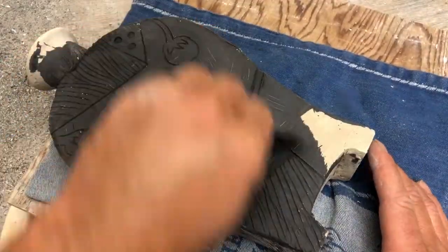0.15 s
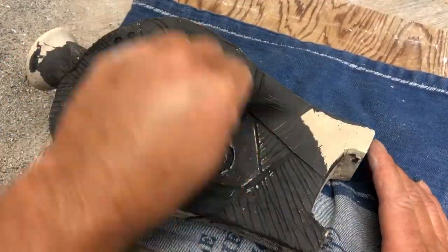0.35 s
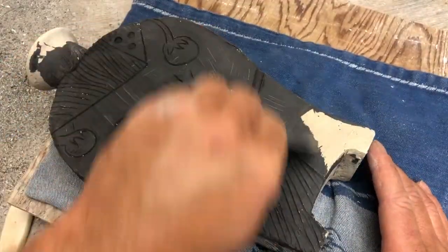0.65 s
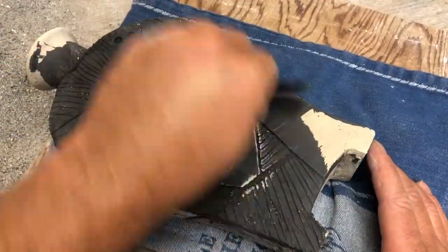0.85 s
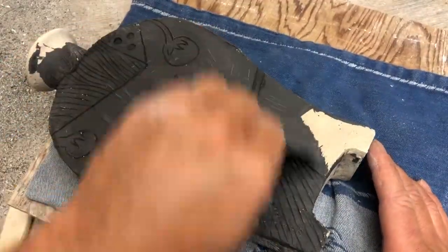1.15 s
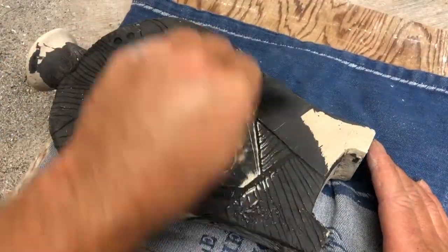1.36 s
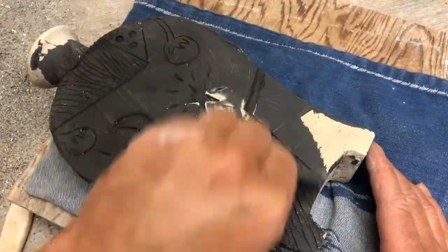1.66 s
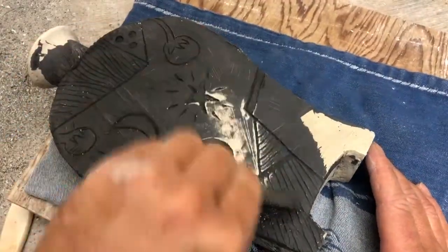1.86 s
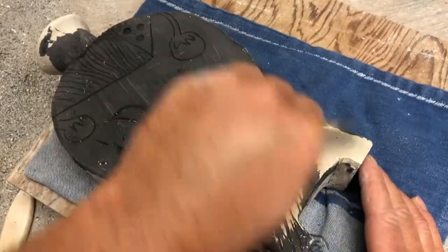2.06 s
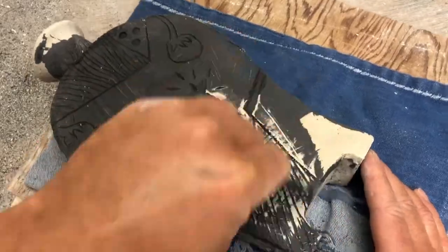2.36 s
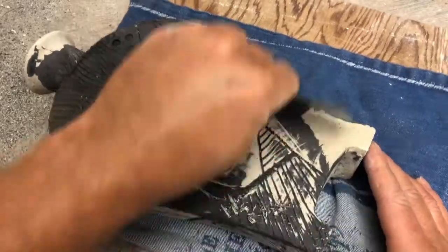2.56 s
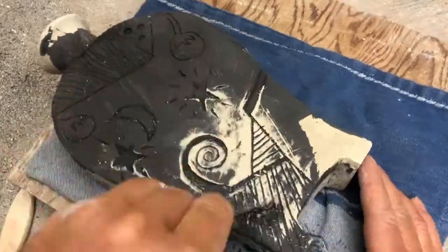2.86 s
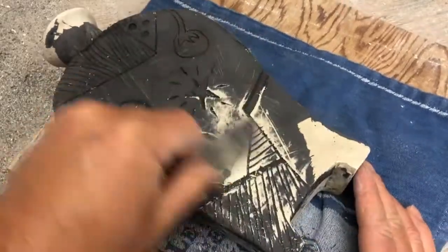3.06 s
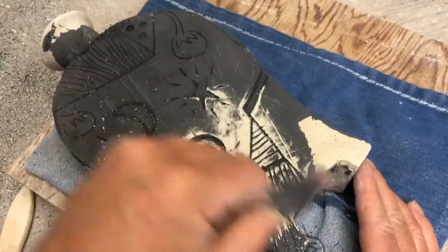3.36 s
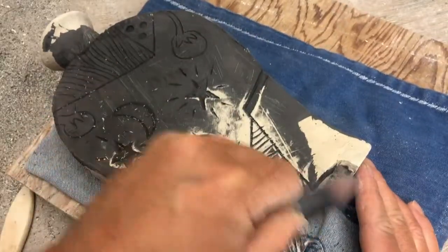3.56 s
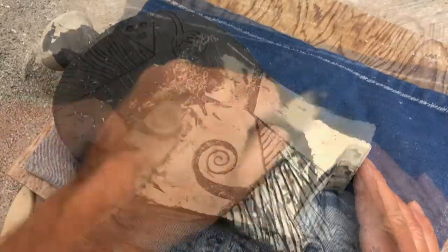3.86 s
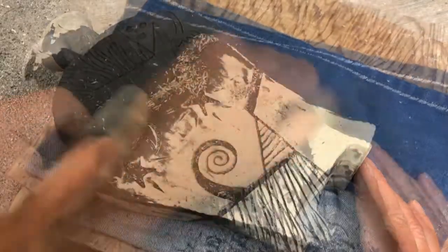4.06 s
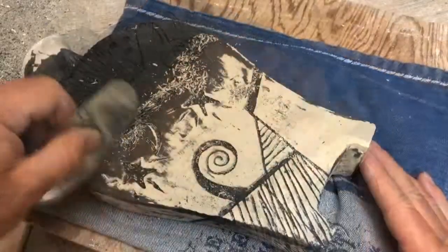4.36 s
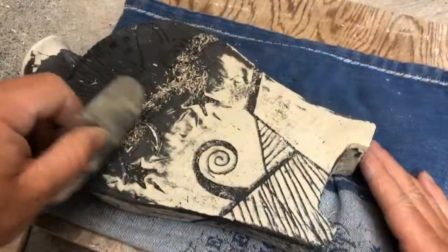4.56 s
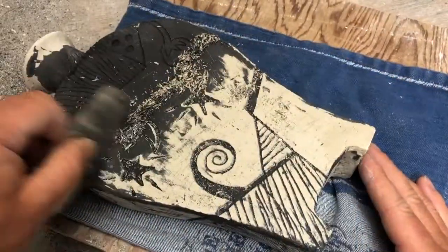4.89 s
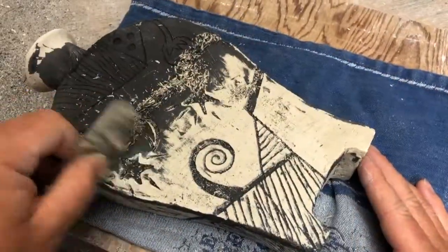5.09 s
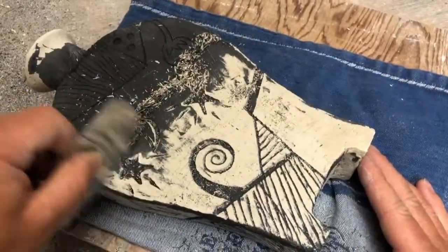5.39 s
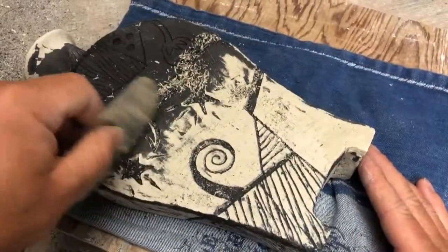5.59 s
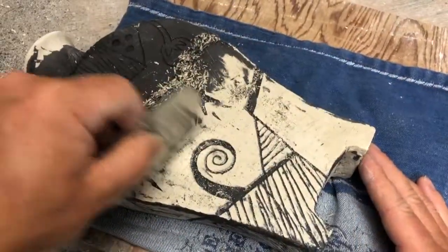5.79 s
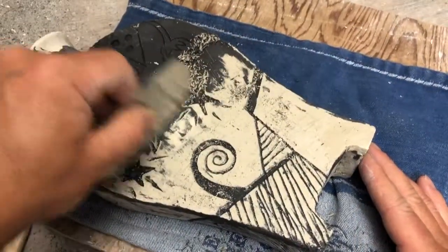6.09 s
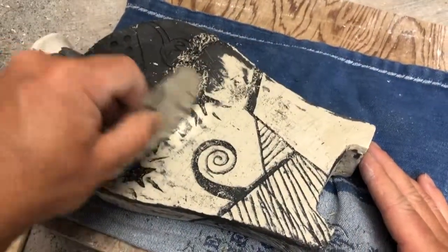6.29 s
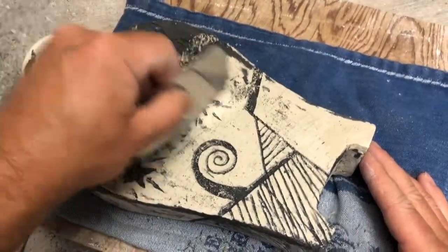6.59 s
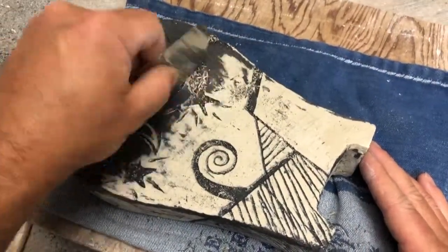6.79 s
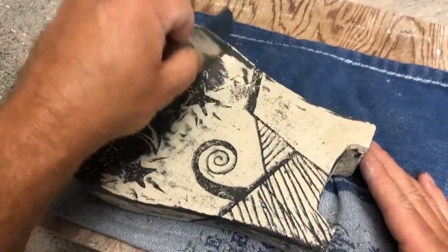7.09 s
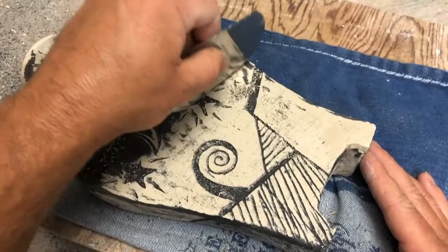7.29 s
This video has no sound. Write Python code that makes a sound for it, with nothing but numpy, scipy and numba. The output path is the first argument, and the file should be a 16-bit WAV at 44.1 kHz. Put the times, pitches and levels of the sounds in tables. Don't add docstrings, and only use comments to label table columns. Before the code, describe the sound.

A hand-held steel scraper works on a dry clay slab on a towel-covered wooden table. About twice a second it lands with a small tick and low thump, then drags in a short, gritty rasp. Early strokes are even; later ones grow more irregular, with bright cracks as the edge jumps grooves. Close phone microphone in a quiet, lightly reverberant workroom with a faint hum.

```python
import sys
import numpy as np
from scipy import signal
from scipy.fft import rfft, irfft
from scipy.io import wavfile
from scipy.ndimage import uniform_filter1d
from numba import njit

SR = 44100
rng = np.random.default_rng(int(sys.argv[2]) if len(sys.argv) > 2 else 0)


def volts_from_db(level):
    exponent = np.asarray(level, float) / 20
    return 10 ** exponent


def pcm_store(signal):
    levels = np.round(np.clip(np.atleast_2d(signal), -1, 1) * 32767)
    wavfile.write(sys.argv[1], SR, levels.astype(np.int16).T)


N = 328118

# (frequency [Hz], density [dB per Hz])
ROOM_AIR = [(15, -4.5), (25, 13), (66, -12.5), (129, -12.5), (315, -17.5), (361, -13.5), (402, -21),
            (540, -26), (854, -30), (1000, -33), (4300, -34.5), (7380, -39), (11100, -40), (14500, -47),
            (15700, -47.5)]
# (frequency [Hz], width [Hz], level [dB rms])
LAMPS_AND_FAN = [(358, 14, -79), (1916, 30, -92), (6266, 60, -91), (10300, 60, -93), (11289, 80, -87.5)]
ROOM_AIR_DB = -65.5
WALL_LAGS = np.array([523, 691, 887, 1069, 1301, 1553, 1831, 2141])
WALLS_T60_S, WALLS_DAMP, SCRAPE_TO_WALLS_DB, BLOWS_TO_WALLS_DB = 0.28, 0.14, -13, -13.5
SCATTER_T60_S = 0.04

# (frequency [Hz], swing pushed mid-slab [ratio], swing pushed near the rim [ratio], t60 [s])
TABLE_MODES = [(41.6, .7, .4, .75), (56.4, .25, .6, .75), (79, 1.9, .4, .23), (83, -4.3, -2.6, .17)]
# (frequency [Hz], width [Hz], level [dB])
TREMBLE_MODES = [(40.3, 18.0, -7.5), (62.4, 4.6, -17.0), (76.9, 5.3, -5.5)]
# (frequency [Hz], level [dB], t60 [s])
BOARD_MODES = [(137, 5, 0.24), (224.7, 3.5, 0.09)]
# (time [s], table thump [dB], board [dB])
LIFTS = [(0.407, -38.5, -60), (0.907, -36.5, -45.5), (1.407, -37, -65), (1.919, -46, -58.5),
         (2.349, -43, -77), (2.736, -36, -73.5), (3.036, -71.5, -35.5), (3.187, -45, -64),
         (3.559, -40, -54), (3.989, -38, -72), (4.383, -37.5, -73), (4.819, -41, -69), (5.147, -46, -61),
         (5.431, -44.5, -44), (5.843, -48, -81), (6.166, -36, -57), (6.188, -37.5, -33.5),
         (6.671, -42.5, -68), (7.06, -43, -52), (7.158, -39, -80.5)]
PUSH_DELAY_S, PUSH_S = 0.003, 0.014
SHAKE_REST_DB, SHAKE_RISE_S, SHAKE_FADE_DB_PER_S = -60, 0.018, 78.5

# (time [s], slab knock peak [dB], edge tick [dB], table trembling [dB], table thump [dB])
LANDINGS = [(0.195, -39, -46.5, -59, -34.5), (0.712, -38, -39, -56, -33), (1.171, -38, -45.5, -63, -34),
            (1.689, -40, -44.5, -62.5, -33), (2.151, -41.5, -51, -63, -35), (2.577, -35, -45, -33, -34),
            (2.997, -39, -42, -38, -32), (3.393, -35.5, -44, -38, -31), (3.804, -33.5, -52, -32.5, -30),
            (4.227, -46, -47.5, -35.5, -38.5), (4.695, -64, -34, -39, -35.5), (5.061, -46, -28, -37.5, -30),
            (5.369, -41, -36, -29.5, -23.5), (5.711, -54.5, -42, -34, -24.5), (6.102, -68, -30, -39, -26),
            (6.552, -55, -48.5, -45, -40), (7.004, -48, -33, -36.5, -26), (7.379, -41, -41.5, -43, -29.5)]
# (time [s], peak [dB], treble above it [dB], bass above it [dB], pitch [Hz])
SNAPS = [(2.297, -36, -18.5, -31.5, 1850), (2.705, -26, -28.5, -14, 1950), (2.741, -28, -32, -3, 1390),
         (3.128, -26, -27, -32, 1730), (3.879, -33, -4, -3, 2900), (4.393, -34.5, -1.5, -34, 3020),
         (4.767, -37, 2, -19, 2400), (4.818, -21, -32, -11, 765), (4.833, -30, -10, -28, 3380),
         (5.087, -37, 0.5, -4, 4630), (5.135, -35, -4, -20.5, 4630), (5.427, -31, -2.5, -5, 1700),
         (5.477, -4.5, -16, -42.5, 2380), (5.741, -27.5, -4, -10.5, 800), (5.83, -6, -22, -19, 1550),
         (6.173, -28, -21.5, -4.5, 920), (6.759, -35.5, -3, -30.5, 915), (7.41, -39, -10, -20, 2820)]
# (time [s], peak [dB], pitch [Hz])
CRUMBS = [(0.319, -30.5, 2530), (0.344, -33.5, 2900), (0.436, -33.5, 2900), (0.811, -31, 2660),
          (0.9, -33, 2964), (4.546, -53.5, 2060), (0.695, -44, 2727), (1.214, -37.5, 3350),
          (2.611, -37.5, 2900), (3.179, -44, 1190), (4.151, -45, 2075), (4.335, -46, 800),
          (6.143, -33, 2704), (6.708, -43, 2390), (6.901, -46, 3100), (6.981, -44, 2820),
          (7.365, -56, 7000), (1.732, -39, 1640), (1.745, -41, 3340), (2.173, -42, 3330),
          (2.679, -37, 2750), (3.423, -42, 2890), (3.842, -48, 2930), (3.96, -35, 900), (4.247, -42, 1820),
          (5.151, -37, 1510), (5.416, -46, 4700), (6.577, -50, 2750), (7.037, -40, 3310),
          (7.4207, -36, 5100)]
# (frequency [Hz], level [dB], t60 [s])
SLAB_MODES = [(197.4, -12.5, 0.295), (284, -3, 0.036), (350, 0, 0.068), (590, -1, 0.0167),
              (733, -8.5, 0.0275)]
# (frequency [Hz], level [dB], t60 [s])
EDGE_MODES = [(855, -1, 0.029), (1310, 2.5, 0.011), (1528.5, -6.5, 0.1), (2218, -2.5, 0.049),
              (2900, 3, 0.024), (3350, -3, 0.031), (4100, -14, 0.009), (5400, -5, 0.018)]
# (frequency [Hz], level [dB], t60 [s])
PING_MODE = (2900, 1.5, 0.044)
# (frequency [Hz], level [dB], t60 [s])
RIM_MODES = [(785, -6, 0.029), (1010, 1.5, 0.0083), (1470, 5.5, 0.0033), (1750, 1, 0.01),
             (2250, -2.5, 0.028), (2660, 0, 0.0065), (3578, 8, 0.0032), (5330, -13, 0.018),
             (6500, -14, 0.0091)]
# (frequency [Hz], level [dB], t60 [s])
CRACK_MODES = [(800, -0.5, 0.017), (924, 2, 0.019), (1220, 3, 0.019), (1404, 1.5, 0.016),
               (1550, 4.5, 0.017), (1844, 1, 0.023), (1940, -8.5, 0.035), (2210, -5.5, 0.011),
               (2530, 3.5, 0.019), (3885, -1, 0.015), (4050, -10, 0.032), (5050, 1.5, 0.01),
               (6170, -4, 0.0074), (7340, 2.5, 0.0082)]
# (frequency [Hz], level [dB], t60 [s])
AFTER_MODES = [(765, -10.5, .1), (915, -2.5, .12), (1176, 1, 0.19), (1360, -5, .12), (1555, -4.5, .12),
               (1615, -3, .12), (1986, -4.5, .1), (2240, -3, .1), (2520, -1.5, .11), (3600, -5.5, 0.16),
               (3900, -9, 0.12), (4660, -5.5, .12)]
AFTER_DB, CRUMB_TREBLE_DB, CRUMB_BASS_DB = -17, -5, -7.5
DULL_PER_KHZ = 0.084
FLAT_FROM_S, RIM_FROM_S = 2.5, 4.6

# (frequency [Hz], width [Hz], level [dB])
BLADE_MODES = [(1950, 55, 9), (2500, 110, -15), (2900, 54, 2), (3240, 290, -1.5), (4410, 230, -7),
               (5640, 780, 6), (7680, 106, -38), (8700, 180, -33)]
# (frequency [Hz], level [dB])
SLAB_DRONE = [(198, -8.5), (290, -3.5), (355, -3.5), (460, -8.0)]
# (frequency [Hz], density [dB per Hz])
GRIT_SPECTRUM = [(260, -57), (450, -13.5), (650, -11), (960, -13), (1350, -5.5), (1900, -5), (2450, -0.5),
                 (3300, 0.5), (4400, 4.5), (5230, 4.5), (6060, -2), (8000, -7.5), (11800, -14.5),
                 (15700, -21)]
# (time to bite [s], drag [s], grit at the bite [dB], grit at the lift [dB], blade singing [dB])
STROKES = [(0.055, 0.14, -49.5, -46, -0.5), (0.078, 0.12, -46.5, -48, -3.5), (0.088, 0.14, -48, -46, -2.5),
           (0.075, 0.11, -41.5, -46.5, -4), (0.059, 0.13, -45, -46, -1), (0.072, 0.099, -48, -50.5, 5.5),
           (0.037, 0.1, -55.5, -48.5, 3), (0.047, 0.12, -50.5, -51.5, 2), (0.079, 0.1, -51, -46, 6),
           (0.032, 0.082, -54, -44.5, 0), (0.028, 0.11, -53, -50, -19), (0.039, 0.07, -49.5, -49.5, -19),
           (0.054, 0.06, -58, -47, -7), (0.041, 0.0745, -56, -45.5, -28), (0.033, 0.031, -53.5, -43.5, -18),
           (0.063, 0.13, -51.5, -50.5, 12), (0.037, 0.13, -51, -51.5, 10), (0.045, 0.055, -46, -35, 5.5)]
# (wait before sliding [s], low free mode [Hz], its level [dB],
# high free mode [Hz], its level [dB]), levels above the grit
HOLDS = [(0.017, 1640, -7.5, 5300, -11.5), (0.019, 1720, -14, 3445, -13), (0.031, 1660, -21, 4500, -14),
         (0.018, 1700, -9, 3360, -15), (0.016, 1720, -14.5, 3900, -9), (0.022, 1300, -14, 4900, -14),
         (0.016, 1250, -16, 4715, -30), (0.018, 1800, -17, 5330, -24), (.035, 1600, -18, 2390, -17),
         (0.015, 1750, -15, 5340, -26), (0.011, 2400, -6.5, 3400, -6.5), (0.012, 1700, -23, 4600, -8),
         (0.034, 1900, -11, 4750, -8.5), (.03, 1600, -17, 2800, -20), (0.012, 2400, -27, 4300, -11),
         (0.02, 1400, -23, 5150, -12), (0.017, 3000, -33, 5150, -7.5), (.027, 2600, -15, 5150, -4)]
DUSTY = [-0.1, 0.2, 0, 0.4, 1.9, -0.3, -0.1, -0.4, -0.6, -1, -1.8, -2.2, 1.5, 0.6, -1.5, 0.7, 1.8, -4.5]
# (dust [dB], drone [dB], singing [dB], singing pitch [Hz])
FIST_COLOURS = [(-8, -6, -13, 3200), (-6.5, -17, -4, 2600), (-3.5, -10.5, -1.5, 2910),
                (-5, -3.5, -12, 4200)]
FLAT_COLOURS = [(-6, -5.5, -8, 2950), (-3, -16, -5, 2930), (-3.5, -12.5, -16, 3060), (-4, -6.5, -43, 3400)]
RIM_COLOURS = [(-3.5, -7.5, -10, 2970), (-1, -18, -10, 2990), (-0.5, -7, -25, 2990), (-26, -17, -42, 2990)]
SKID_COLOURS = [(-12, 3, -8, 2500), (-6, 8.5, -25, 4600), (-7.5, -7, -6, 2100), (-21, -12.5, -33.5, 2500)]
GRAZE_COLOURS = [(-6, -13, -15.5, 2800), (-2.5, -24, -32, 2630), (-5, -11, -5, 2400),
                 (4.5, -20.5, -6, 3700)]
# (low level [dB], low mode [Hz], high level [dB], high mode [Hz])
MUTED = [-40, 1800, -40, 4600]
# (time [s], grit [dB], fade [s])
SKIDS = [(5.488, -37.5, 0.068), (5.842, -35.5, 0.077)]
# (time [s], rise [s], grit [dB], fade [s])
GRAZES = [(4.141, 0.012, -66, 0.192), (4.46, 0.087, -59.5, 0.0307), (6.23, 0.12, -71.5, 0.096),
          (6.89, .014, -59.5, .17), (6.978, 0.014, -60.5, 0.022)]
# (time [s], length [s], level [dB])
SURGES = [(1.339, 0.021, 1), (2.288, 0.0274, 1), (2.677, 0.023, 1.5), (4.768, 0.0052, 2),
          (5.137, 0.0074, 2.5), (5.184, 0.0093, 2.5), (6.183, 0.0081, 4), (6.651, 0.022, 1),
          (6.681, 0.01, -1), (6.766, .008, 3), (7.08, .015, 1.5), (7.142, 0.014, -3), (7.153, .012, 3)]
USUAL_DB = -47
DRONE_PER_DB, DUST_PER_DB = -0.84, 0.29
SHEEN_HZ, SHEEN_WIDTH_HZ, SHEEN_DB, SHEEN_PER_DB = 11600, 2200, -5.5, 2.5
TOUCH_DB, TOUCH_FOLLOWS, FILL_POWER, LIFT_S, LIFT_DROP_DB = -62, 0.67, 1.38, 0.1, 30
LOW_RISE, RIM_LOW_RISE, FREE_WIDTH_HZ, FREE_FADE_DB = 0.16, 0.054, 91, -21.5


def level(x, db):
    return x * volts_from_db(db) / np.sqrt(np.mean(x ** 2))


def colour(x, points):
    hz, db = np.transpose(points)
    f = np.fft.rfftfreq(N, 1 / SR) + 1
    return irfft(rfft(x) * volts_from_db(np.interp(np.log(f), np.log(hz), db)), N)


def band(x, lo_hz, hi_hz):
    return signal.sosfilt(signal.butter(3, [lo_hz, hi_hz], "band", fs=SR, output="sos"), x)


def split(x, lo_hz, hi_hz):
    f, spectrum = np.fft.rfftfreq(N, 1 / SR), rfft(x)
    low = 1 / (1 + (f / lo_hz) ** 4)
    high = 1 - 1 / (1 + (f / hi_hz) ** 4)
    return (irfft(spectrum * share, N) for share in (low, 1 - low - high, high))


def walk(rate):
    count = int(N * rate / SR) + 2
    return 1.2 * np.interp(np.arange(N) * (rate / SR), np.arange(count), rng.standard_normal(count))


def decay(seconds, t60_s):
    return 1000. ** (-np.arange(int(seconds * SR)) / SR / t60_s)


@njit
def svf(x, g, k):
    y, b, l = np.empty(len(x)), 0., 0.
    for i in range(len(x)):
        v = (b + g[i] * (x[i] - l)) / (1 + g[i] * (g[i] + k[i]))
        b, l, y[i] = 2 * v - b, l + 2 * g[i] * v, k[i] * v
    return y


def resonate(x, hz, width_hz, bend=0.98):
    return svf(x, np.tan(np.pi * hz / SR) * bend * np.ones(N), width_hz / hz * np.ones(N))


def ring(modes, push_s, scatter_db=0., detune=0.):
    t = np.arange(SR // 4) / SR
    y = np.zeros(len(t))
    for (hz, db, t60), (a, b) in zip(modes, rng.standard_normal((len(modes), 2))):
        y += volts_from_db(db + scatter_db * a) * np.sin(2 * np.pi * hz * (1 + detune * b) * t) * 1000. ** (-t / t60)
    y = y * (1 - np.exp(-t / push_s))
    return y / np.abs(y).max()


def add(out, s, sound):
    i = int(s * SR)
    out[i:i + len(sound)] += sound[:N - i]


def workroom():
    air = colour(rng.standard_normal(N), ROOM_AIR)
    air = air * volts_from_db(ROOM_AIR_DB) / np.std(band(air, 98.0, 16000))
    hum = sum(level(resonate(rng.standard_normal(N), hz, w), db) for hz, w, db in LAMPS_AND_FAN)
    return air * volts_from_db(1.0 * walk(9.1)) + hum


@njit
def walls(x, lags, gain, damp):
    line, soft, out = np.zeros((8, 4096)), np.zeros(8), np.zeros(len(x))
    for i in range(len(x)):
        total = 0.
        for k in range(8):
            soft[k] += (1 - damp) * (gain[k] * line[k, (i - lags[k]) & 4095] - soft[k])
            total += soft[k]
        out[i] = soft[0] - soft[3] + soft[5] - soft[6]
        for k in range(8):
            line[k, i & 4095] = x[i] + soft[k] - total / 4
    return out


def room_echo(scrape, blows):
    clutter = rng.standard_normal(SR // 20) * decay(0.05, SCATTER_T60_S)
    scatter = irfft(np.exp(1j * np.angle(rfft(clutter))))
    blurred = signal.oaconvolve(blows, scatter)[:N] * walk(600)
    sent = volts_from_db(SCRAPE_TO_WALLS_DB) * scrape + volts_from_db(BLOWS_TO_WALLS_DB) * blurred
    return walls(sent + 1e-18, WALL_LAGS, volts_from_db(-60 * WALL_LAGS / SR / WALLS_T60_S), WALLS_DAMP)


def shake():
    t, power = np.arange(N) / SR, volts_from_db(2 * SHAKE_REST_DB)
    for s, _, _, db, _ in LANDINGS:
        since = (t - s).clip(0)
        rise = (since / SHAKE_RISE_S).clip(0, 1) ** 2
        power = power + volts_from_db(2 * (db - SHAKE_FADE_DB_PER_S * since)) * rise
    return 10 * np.log10(power)


def thump(near_rim):
    t = np.arange(SR // 2) / SR
    modes = np.zeros(len(t))
    for hz, middle, rim, t60 in TABLE_MODES:
        modes += (rim if near_rim else middle) * np.sin(2 * np.pi * hz * t) * 1000. ** (-t / t60)
    y = signal.fftconvolve(modes, np.hanning(int(PUSH_S * SR)))
    return y / np.abs(y).max()


def table(shake_db):
    out, middle, rim = np.zeros(N), thump(False), thump(True)
    for s, *_, db in LANDINGS:
        add(out, s + PUSH_DELAY_S, volts_from_db(db) * (rim if s > RIM_FROM_S else middle))
    for s, db, board_db in LIFTS:
        add(out, s, volts_from_db(db) * rim)
        add(out, s, volts_from_db(board_db) * ring(BOARD_MODES, 0.0004))
    push = rng.standard_normal(N)
    tremble = sum(volts_from_db(db) * resonate(push, hz, w) for hz, w, db in TREMBLE_MODES)
    return out + level(band(tremble, 26, 96), -2.5) * volts_from_db(shake_db)


def dust_burst(lo_hz, hi_hz, t60_s):
    return band(rng.standard_normal(SR // 4), lo_hz, hi_hz) * decay(0.25, t60_s)


def landing_knocks():
    out = np.zeros(N)
    for s, knock_db, tick_db, *_ in LANDINGS:
        add(out, s, -volts_from_db(knock_db - 1.5) * ring(SLAB_MODES, 0.0025, scatter_db=1.5, detune=0.01))
        if s < FLAT_FROM_S:
            modes = EDGE_MODES
        elif s < RIM_FROM_S:
            modes = EDGE_MODES + [PING_MODE]
        else:
            modes = RIM_MODES
        tick = ring(modes, 0.0002, scatter_db=2.5, detune=0.009)
        scuff = dust_burst(660, 4300, 0.095)
        add(out, s, volts_from_db(tick_db + 1) * (tick + volts_from_db(-10.0) * scuff))
    return out


def snaps():
    out = np.zeros(N)
    crumbs = [(s, db, CRUMB_TREBLE_DB, CRUMB_BASS_DB, hz) for s, db, hz in CRUMBS]
    for s, db, treble_db, bass_db, hz in SNAPS + crumbs:
        modes = [(f, g + DULL_PER_KHZ * (db + 6) * f / 1000, t60) for f, g, t60 in CRACK_MODES]
        modes.append((hz, -0.4 * db, 0.012))
        crack = ring(modes, 0.00092, scatter_db=3.0, detune=0.0043)
        crack = crack + volts_from_db(AFTER_DB) * ring(AFTER_MODES, 0.002, scatter_db=4.5, detune=0.002)
        spit = dust_burst(2333, 10000, 0.027)
        crack = crack + volts_from_db(-4.0) * dust_burst(550, 4800, 0.021)
        thud = ring(SLAB_MODES[1:], 0.00055, scatter_db=3., detune=0.026)
        add(out, s, volts_from_db(db - 7.5) * (crack + volts_from_db(treble_db + 5.5) * spit + volts_from_db(bass_db) * thud))
    return out


def contacts():
    for landing, stroke, hold, dusty_db in zip(LANDINGS, STROKES, HOLDS, DUSTY):
        s = landing[0]
        bite_s, drag_s, bite_db, lift_db, sing_db = stroke
        wait_s, low_hz, low_db, high_hz, high_db = hold
        grip = FIST_COLOURS if s < FLAT_FROM_S else FLAT_COLOURS if s < RIM_FROM_S else RIM_COLOURS
        hard_db = (bite_db + lift_db) / 2 - USUAL_DB
        touch_db = TOUCH_DB + TOUCH_FOLLOWS * (bite_db - USUAL_DB)
        colours = np.add(grip, [DUST_PER_DB * hard_db + dusty_db, DRONE_PER_DB * hard_db, sing_db, 0])
        rise = LOW_RISE if s < RIM_FROM_S else RIM_LOW_RISE
        bent_hz = low_hz * (1 + rise * np.array([0, 0.25, 0.91, 1]))
        fade_db = np.array([0, 0, 0, FREE_FADE_DB])
        free = np.transpose([low_db + fade_db, bent_hz, high_db + fade_db, np.full(4, high_hz)])
        times = s + np.cumsum([wait_s, max(bite_s - wait_s, 0.008), drag_s, LIFT_S])
        yield times, [touch_db, bite_db, lift_db], np.hstack([colours, free])
    for s, db, fade_s in SKIDS:
        times = s + np.cumsum([-0.006, 0.004, 0.002, fade_s])
        yield times, [db - 27, db, db], np.array([[*c, *MUTED] for c in SKID_COLOURS])
    for s, rise_s, db, fade_s in GRAZES:
        times = s + np.cumsum([0, rise_s, 0.002, fade_s])
        yield times, [db - 10.5, db, db], np.array([[*c, *MUTED] for c in GRAZE_COLOURS])


def hand():
    t, power = np.arange(N) / SR, np.full(N, 1e-12)
    mix = np.full((8, N), 1e-12) * np.c_[[0, 0, 0, 2800, *MUTED]]
    for s, (touch_db, bite_db, lift_db), colours in contacts():
        gone_s = 2 * s[3] - s[2]
        span = slice(int(s[0] * SR), int(gone_s * SR))
        now = t[span]
        db = np.interp(now, [s[1], s[2], gone_s], [bite_db, lift_db, lift_db - 2 * LIFT_DROP_DB])
        db += (touch_db - bite_db) * ((s[1] - now) / (s[1] - s[0])).clip(0, 1) ** FILL_POWER
        power[span] += volts_from_db(2 * db)
        mix[:, span] += volts_from_db(2 * db) * np.array([np.interp(now, s, c) for c in colours.T])
    surge_db = sum(db * np.exp(-((t - s) / length_s) ** 2) for s, length_s, db in SURGES)
    power *= volts_from_db(2 * surge_db)
    return 10 * np.log10(uniform_filter1d(power, size=300).clip(1e-12)), *(mix / power)


def slab_patches(force):
    fade = decay(0.05, 0.0331)
    spots = np.zeros(N)
    for _ in range(6):
        pressed = force * walk(28) * volts_from_db(0.6 * walk(16))
        spots += signal.oaconvolve(pressed, fade * rng.standard_normal(len(fade)))[:N]
    return level(spots / np.sqrt(uniform_filter1d(spots ** 2, size=3000)), -7) + force


def drag(grit_db, dust_db, drone_db, sing_db, sing_hz, low_db, low_hz, high_db, high_hz):
    torn = (rng.random(N) < 6000 / SR) * rng.standard_normal(N)
    crumbs = torn * volts_from_db(2.4 * rng.exponential(size=N).clip(0, 5.5))
    force = (level(crumbs, -2.5) + level(rng.standard_normal(N), -0.34)) * volts_from_db(0.55 * walk(60))
    patches = slab_patches(force)
    bend = 1 + 0.00857 * walk(7.2)
    rings = sum(volts_from_db(db + 1.4 * walk(21)) * resonate(force, hz, w, bend) for hz, w, db in BLADE_MODES)
    body = colour(patches + volts_from_db(-14.0) * rings, GRIT_SPECTRUM)
    singing = resonate(force * volts_from_db(1.5 * walk(82)), sing_hz, 360.0, 1 + 0.015 * walk(7.7))
    drone, grit, dust = split(body, 1500, 6300)
    hiss = band(colour(force, GRIT_SPECTRUM), 5480, 15700)
    dust = volts_from_db(-1) * level(dust, 0) + level(hiss, 0)
    grit = level(grit, -3.5) + level(singing, 0) * volts_from_db(sing_db)
    for db, hz in ((low_db, low_hz), (high_db, high_hz)):
        grit += level(resonate(force, hz, FREE_WIDTH_HZ, bend), 0) * volts_from_db(db + 1.7 * walk(40))
    sheen = resonate(force, SHEEN_HZ, SHEEN_WIDTH_HZ, 1 + 0.013 * walk(2.5))
    dust = level(dust, 0.85) + level(sheen, SHEEN_DB) * volts_from_db(SHEEN_PER_DB * dust_db)
    slab = sum(volts_from_db(db) * resonate(force, hz, 30.0, bend) for hz, db in SLAB_DRONE)
    drone = level(drone, 0.077) + level(slab, -2.8) * volts_from_db(2. * walk(30))
    return volts_from_db(grit_db) * (grit + volts_from_db(dust_db) * dust + volts_from_db(drone_db) * drone)


def scene():
    scrape = drag(*hand())
    blows = landing_knocks() + snaps()
    return (workroom() + room_echo(scrape, blows) + table(shake()) + blows + scrape)[None]


def top_cut(x):
    return signal.sosfilt(signal.butter(12, 15850, fs=SR, output="sos"), x)


def record(dry):
    low = signal.butter(2, 30., "high", fs=SR, output="sos")
    top = signal.ellip(10, .2, 70, 15800, fs=SR, output="sos")
    mix = signal.sosfilt(np.vstack([low, top]), dry)
    return top_cut(mix)


dry = scene()
out = record(dry)
pcm_store(out)
```